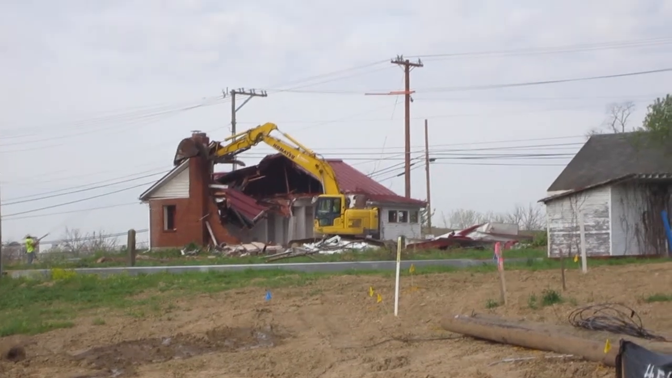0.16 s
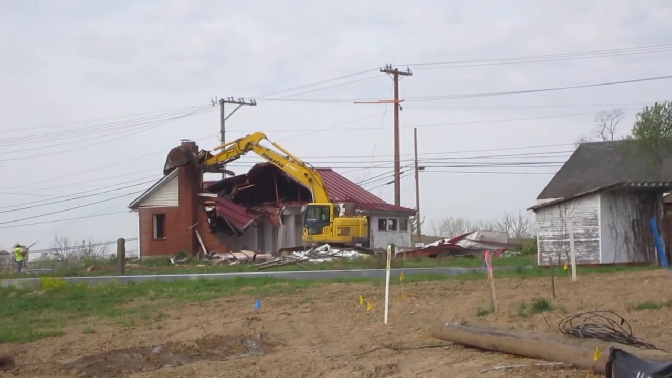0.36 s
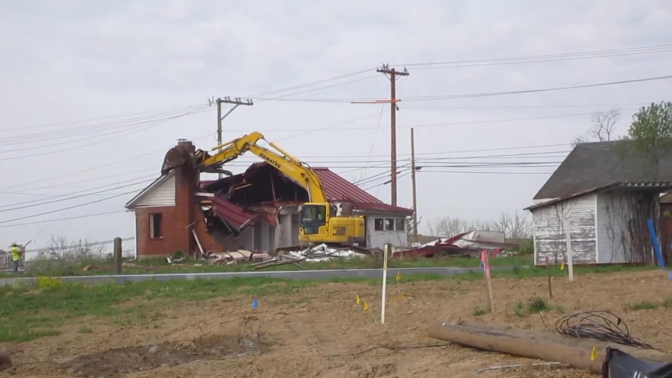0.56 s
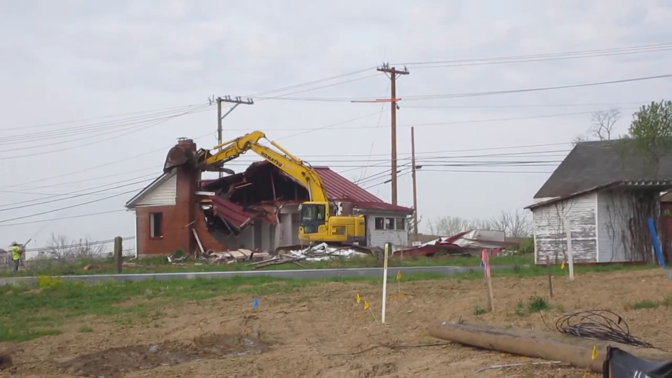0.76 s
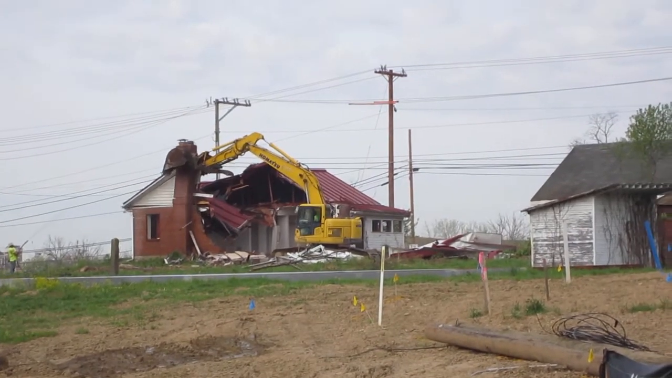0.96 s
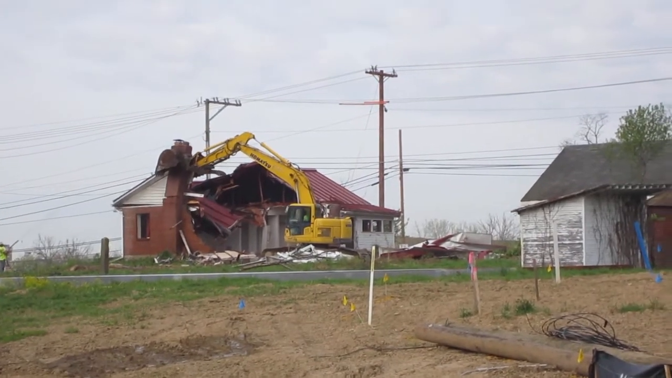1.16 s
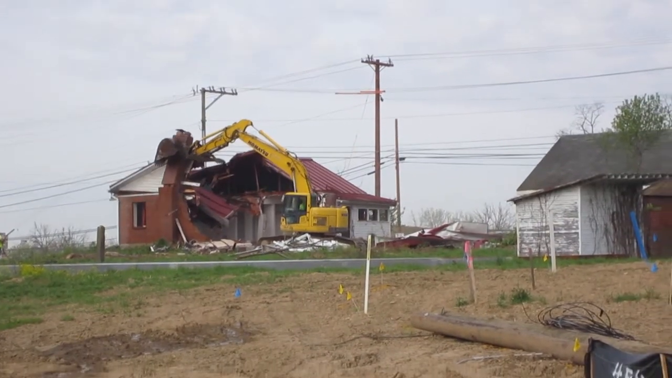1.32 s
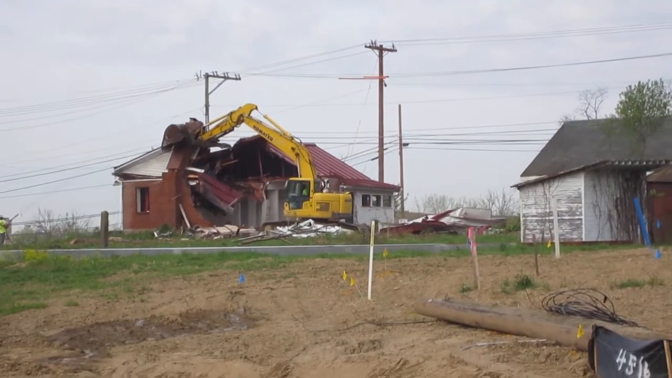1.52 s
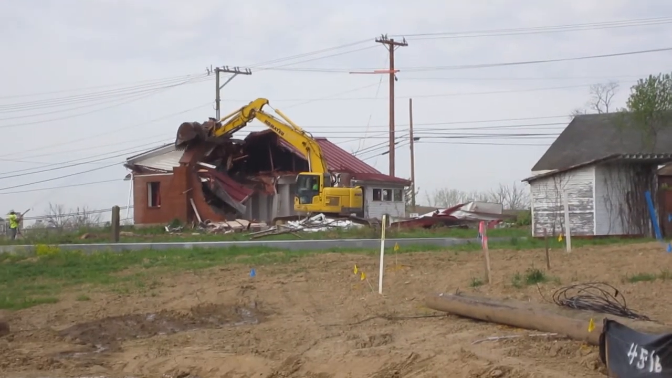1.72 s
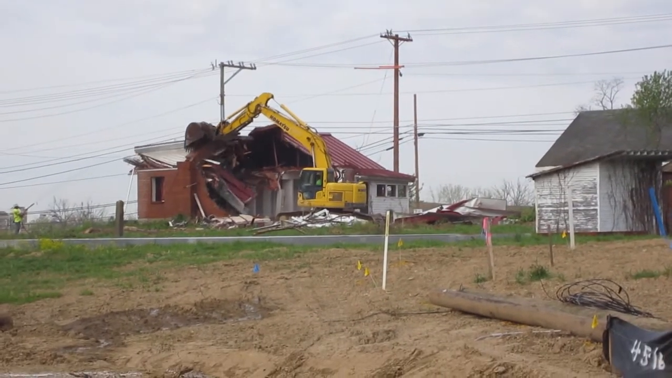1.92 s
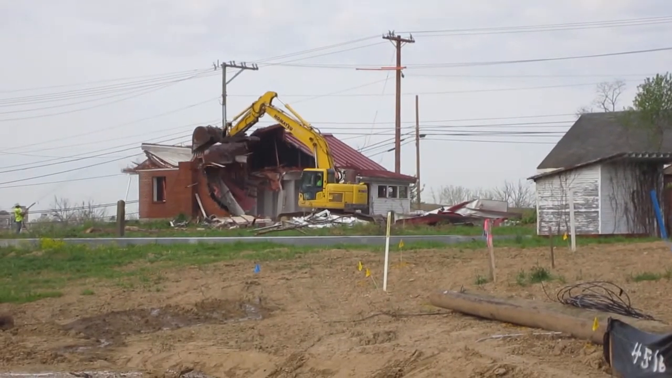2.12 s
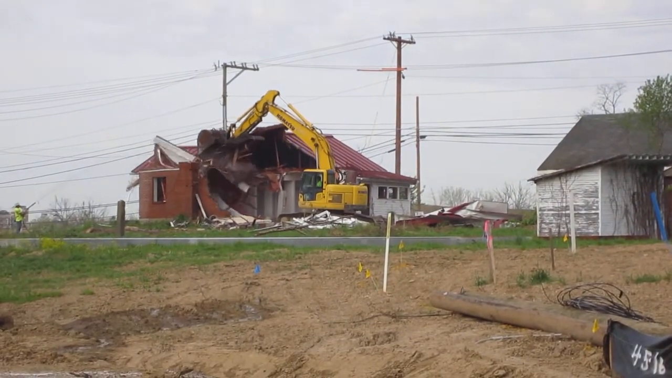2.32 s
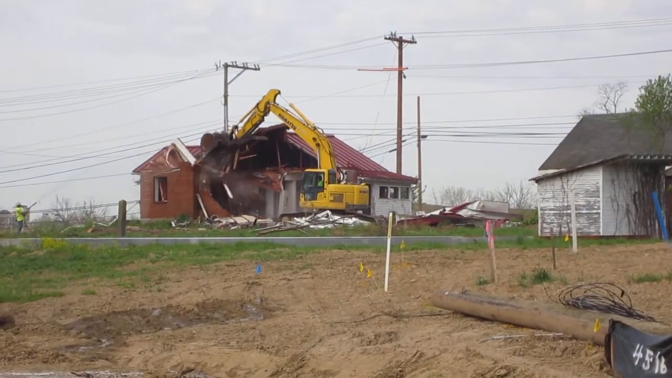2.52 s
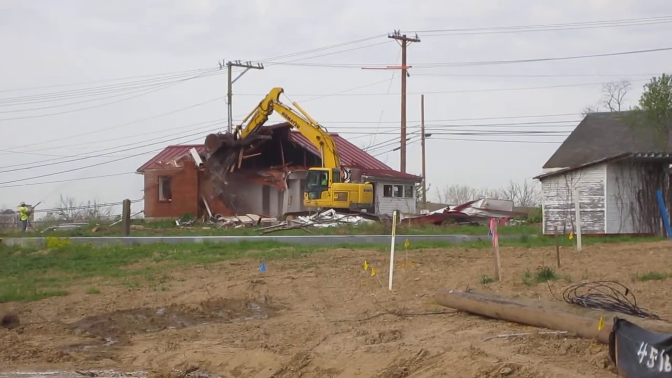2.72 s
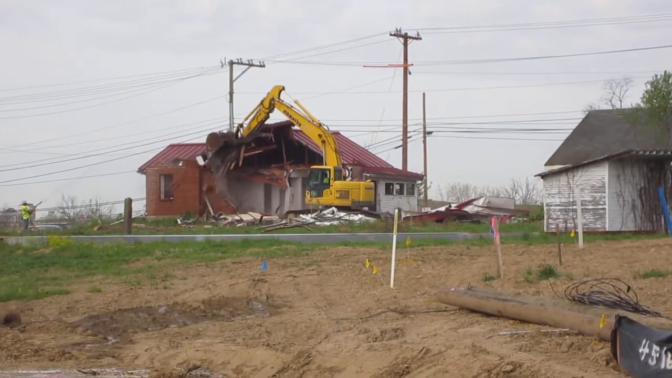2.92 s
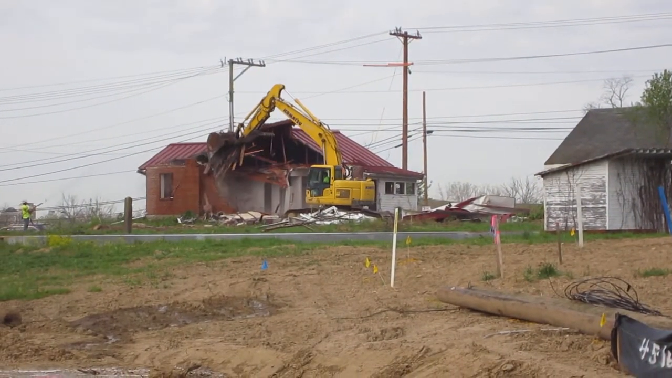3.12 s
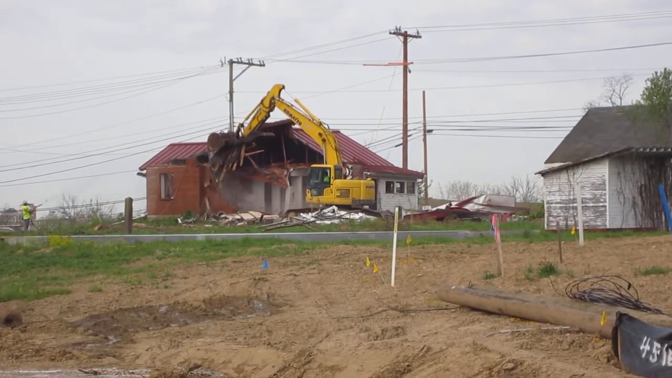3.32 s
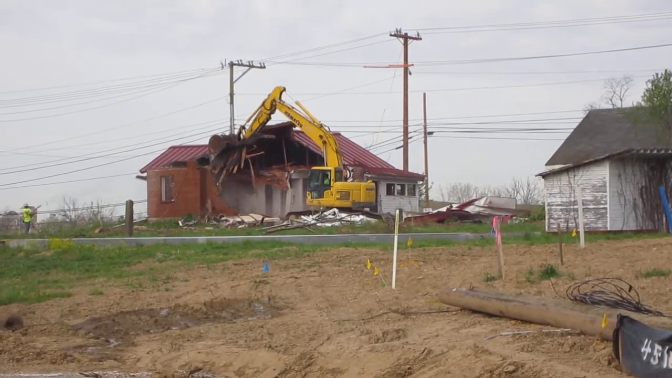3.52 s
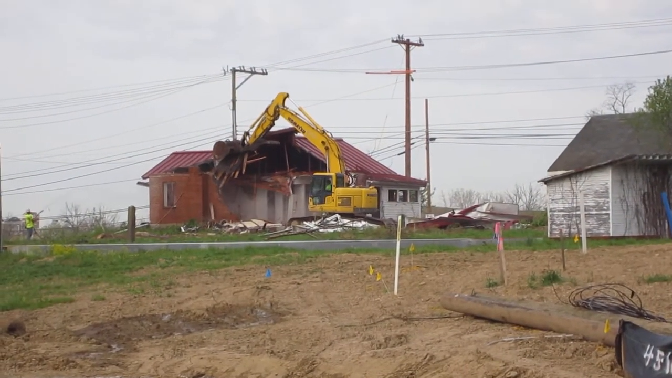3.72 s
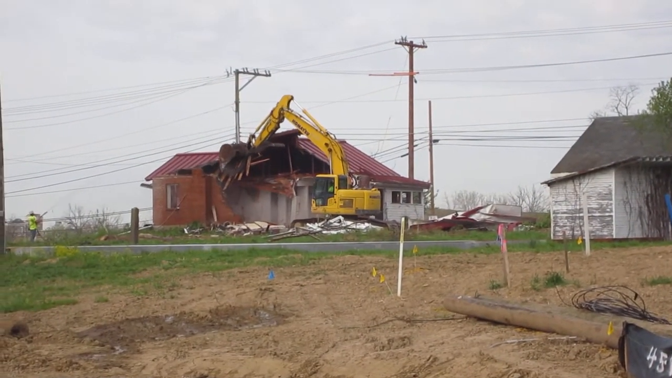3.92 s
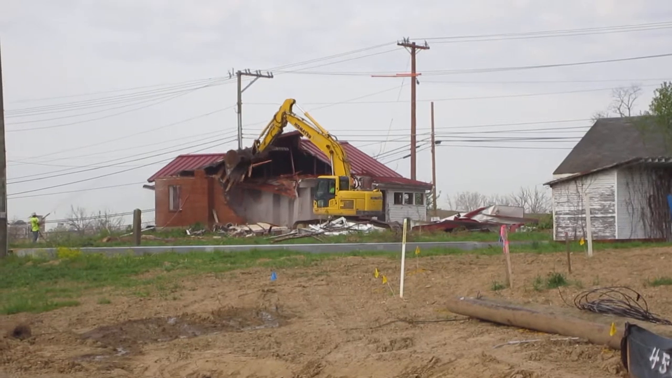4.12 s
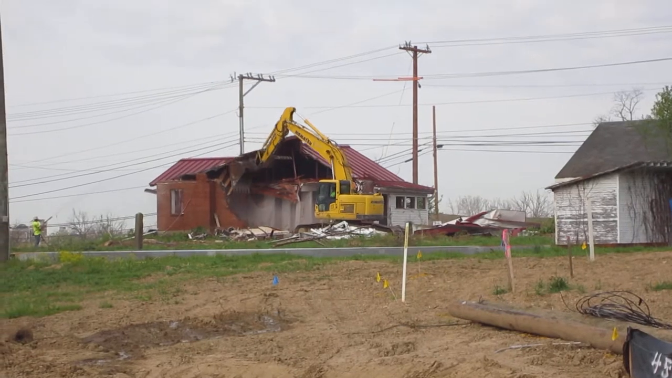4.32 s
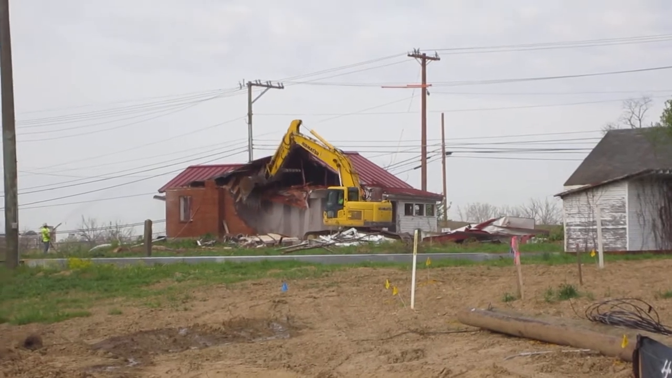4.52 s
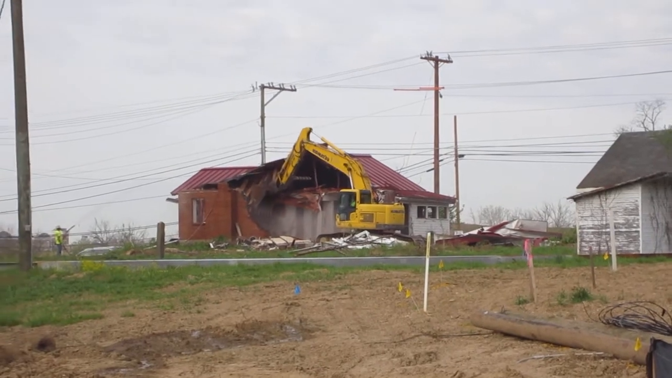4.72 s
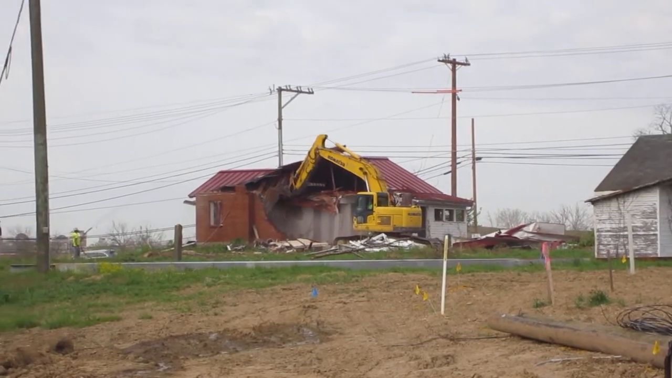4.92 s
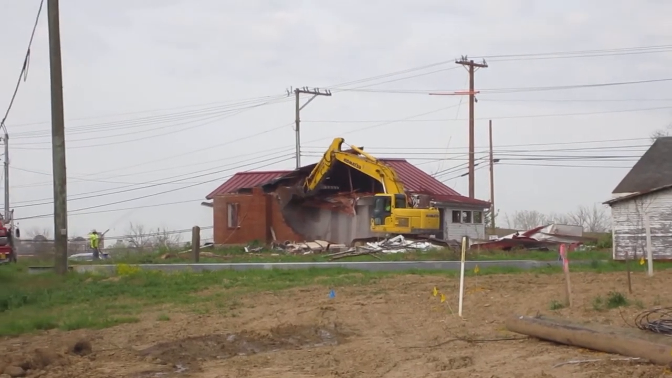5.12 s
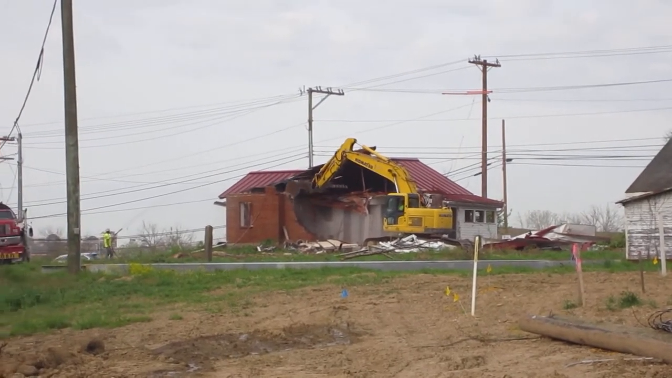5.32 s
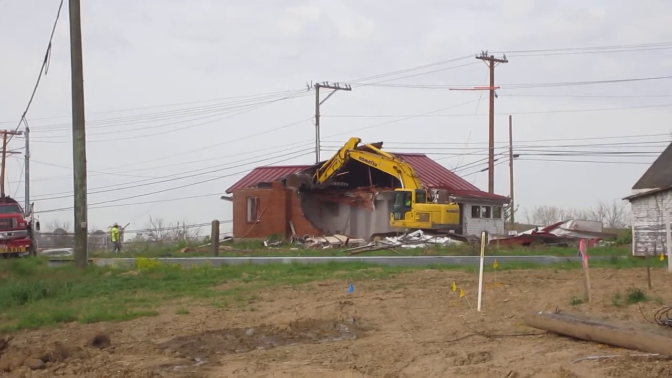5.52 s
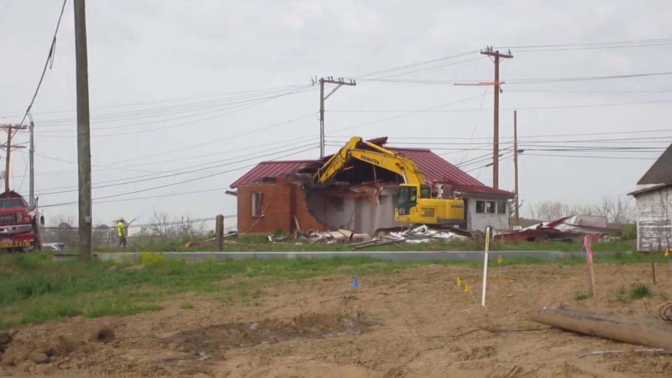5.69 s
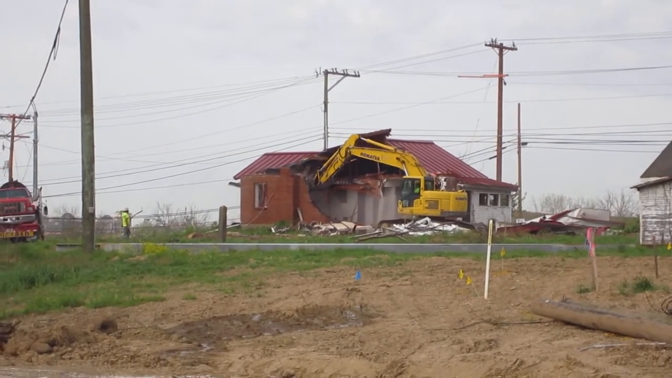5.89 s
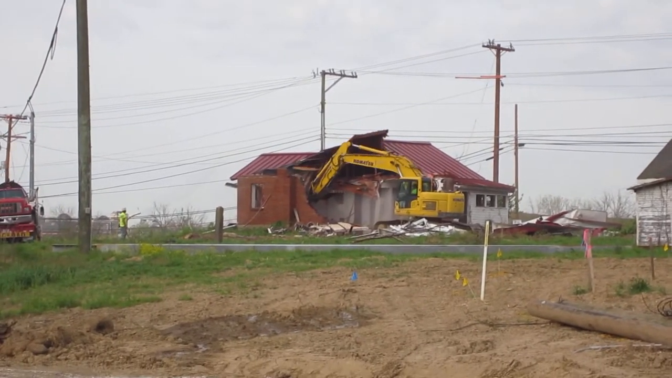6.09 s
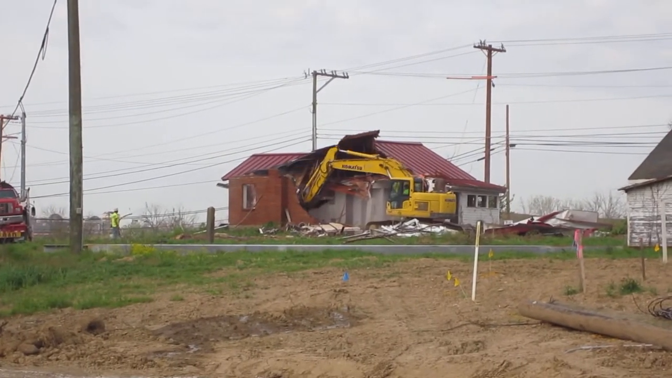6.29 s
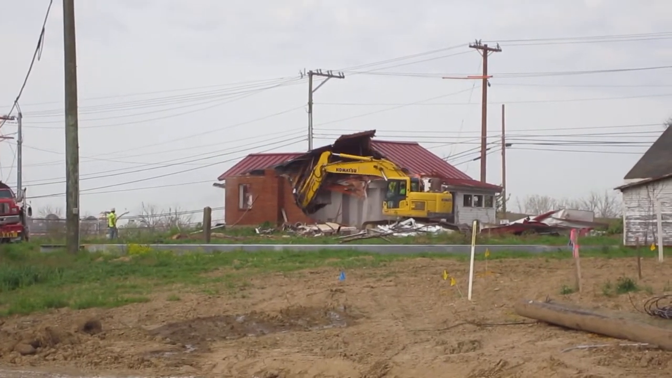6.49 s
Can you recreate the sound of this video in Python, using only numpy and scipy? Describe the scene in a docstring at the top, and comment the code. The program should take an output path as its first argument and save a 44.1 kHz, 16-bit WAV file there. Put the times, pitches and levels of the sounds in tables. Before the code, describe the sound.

Sharp timber cracks, cascading debris and deep masonry thuds over a low, uneven excavator engine, heard from a distance outdoors, with a final fresh crunch.

```python
"""A brick and timber house is pulled down by a diesel excavator across a field; nearby sheds echo it.
Rubble pours as clumps of small resonant impacts; beams crack as noise bursts with one board ringing;
scraps clink, walls shudder and masonry thuds down as swells of resonant noise.
Under it the engine fires unevenly, drones and whines.
A small camera microphone pair adds hiss, a notch and two faint whistles of its electronics."""
import sys
import numpy as np
from scipy import signal
from scipy.fft import rfft, irfft
from scipy.io import wavfile
from scipy.ndimage import uniform_filter1d

SR = 44100
rng = np.random.default_rng(int(sys.argv[2]) if len(sys.argv) > 2 else 0)


def log_audio(samples):
    """Write samples as a 16-bit WAV file to the path given in sys.argv[1]."""
    # one column per channel
    frames = np.atleast_2d(samples).T
    # limit to full scale, then quantise
    limited = np.clip(frames, -1, 1)
    pcm = np.round(limited * 32767).astype(np.int16)
    wavfile.write(sys.argv[1], SR, pcm)


N = 288855
T = np.arange(N) / SR

# colour of breaking wood and brick after the ground reflection, relative: [f/Hz, level/dB per Hz]
DEBRIS = [(150, -6.5), (400, -12), (520, -2.5), (680, 3), (950, -4), (1250, 0.5), (1480, -8), (1700, -5.5),
          (2500, -18.5), (4000, -27.5), (5500, -33), (7000, -47.5), (9500, -54.5), (12000, -63.5),
          (15000, -78.5)]
# cracks of beams and boards, before the yard's echoes:
# [t/s, level/dB, ring f/Hz, burst t60/s, brightness/dB per octave above 750 Hz]
CRACKS = [(0.2265, -32.5, 649, .12, -8), (.3034, -11, 1283, 0.0979, -1), (.305, -18, 750, .1, -9),
          (.3284, -21, 804, 0.195, -4), (.385, -25, 677, .2, -4), (.9772, -16.5, 649, 0.0293, 2.5),
          (.9914, -21.5, 813, 0.197, -2), (1.0816, -35, 655, .25, 4), (1.2155, -36, 875, .2, 3.5),
          (1.1453, -38.5, 845, .08, 3), (1.2997, -35.5, 1130, 0.0725, 6), (1.321, -34.5, 1152, 0.123, 5),
          (1.3723, -16, 1080, 0.1004, 0), (1.3894, -23, 617, 0.149, 3), (1.422, -29, 1290, 0.16, 5),
          (1.4671, -20.5, 650, 0.108, 2.5), (1.499, -16, 980, 0.077, -0.5),
          (1.5142, -17.5, 652.6, .06, 1.5), (1.5589, -18.5, 594, 0.102, 0.5), (1.6224, -28, 841, .1, 5),
          (1.632, -20, 845, .08, 2), (1.6834, -27, 616, 0.184, 1.5), (1.706, -15.5, 1250, .05, 1),
          (1.7278, -21, 1104, .07, 0), (1.803, -23.5, 1263, 0.036, 4.5), (1.8536, -28, 1309, .1, 4.5),
          (1.8851, -17.5, 1264, 0.045, 2.5), (1.9215, -14, 1325, 0.0494, 2.5),
          (1.9739, -21.5, 644.5, 0.09, 2), (2.0532, -17, 790, 0.06, 3), (2.1014, -23.5, 756, 0.066, 6.5),
          (2.153, -17, 1290, 0.0965, 1.5), (2.2724, -18, 1068, .08, -7.5), (2.3436, -10.5, 1096, 0.092, -1),
          (2.3845, -14.5, 1260, .09, -3.5), (2.4522, -12, 675, .032, 1), (2.4936, -17, 1208, .07, -6),
          (2.5429, -12.5, 719, 0.064, 3.5), (2.6045, -21, 1255, 0.0596, 6.5),
          (2.9753, -11.5, 1315, .05, -4.5), (3.0408, -7.5, 1645, 0.036, .5), (3.0891, -19, 1290, .07, 3),
          (3.1414, -11, 608, 0.0563, 3), (3.1899, -18.5, 1127, .026, 1.5), (3.4533, -23.5, 1203, .15, 6),
          (3.5538, -20, 782, 0.0615, 2.5), (3.6364, -24.5, 1276, .095, -2),
          (3.8053, -38.5, 727, 0.115, 4.5), (3.9232, -29, 1347, 0.097, 0), (4.8888, -48.5, 719, 0.071, 6),
          (5.2005, -43.5, 789, 0.057, 4.5), (5.3844, -35.5, 1151, 0.096, 1.5),
          (5.5825, -35, 516.3, 0.099, -1), (5.732, -38, 680, .16, 5), (5.7734, -30, 1150, 0.057, 2.5),
          (5.8431, -35, 1850, .2, 6), (5.958, -30, 1221, .14, -4), (5.9974, -25, 1129, 0.0985, 1),
          (6.123, -36, 678, .11, 7.5), (6.1439, -24, 578.6, 0.148, 0.5), (6.2954, -20, 508, .076, 0),
          (6.339, -21, 1170, 0.0645, 4), (6.3834, -24.5, 1069, 0.073, 4.5),
          (6.5237, -22.5, 1266, 0.047, 5.5)]


def gain_of(db):
    """Amplitude factor of a level in dB."""
    return 10 ** (np.asarray(db) / 20)


def evened(x):
    """Scales a signal to an RMS of 1."""
    return x / np.sqrt(np.mean(x ** 2) + 1e-20)


def read(points, hz):
    """Reads a (Hz, value) table along a logarithmic frequency axis."""
    f, value = np.transpose(points)
    return np.interp(np.log(hz + 1), np.log(f + 1), value)


def add(mix, s, sound):
    """Adds a sound into the mix from s seconds on."""
    part = mix[round(s * SR):][:len(sound)]
    part += sound[:len(part)]


def colour(x, points):
    """Causal, minimum-phase filter whose gain follows a (Hz, dB) table."""
    hz = abs(np.fft.fftfreq(16384, 1 / SR))
    log_gain = np.log(gain_of(read(points, hz)))
    response = np.exp(np.conj(signal.hilbert(log_gain)))
    taps = np.fft.ifft(response).real[:4096]
    return signal.oaconvolve(x, taps)[:len(x)]


def ring(x, hz, width_hz):
    """One resonance of gain 1 at its centre."""
    return signal.lfilter(*signal.iirpeak(hz, hz / width_hz, SR), x)


def brighten(x, db_per_octave, mid_db=0):
    """Tilts the octave bands from 750 Hz to 6 kHz; slope and lift at 1.5 kHz may change in time."""
    hz, spectrum = np.fft.rfftfreq(len(x), 1 / SR), rfft(x)
    octave = np.clip(np.log2(hz / 750 + 1e-9), 0, 4)
    out = 0
    for k in range(5):
        band = irfft(spectrum * np.clip(1 - abs(octave - k), 0, 1), len(x))  # overlapping triangles
        lift_db = min(k, 3) * db_per_octave + (k == 1) * mid_db
        out = out + gain_of(lift_db) * band
    return out


def knocks(rows):
    """Noise through one steep resonance, swelling quickly and falling more slowly.

    Rows: s, dB before the swell, Hz, width in Hz of one filter pass, length in s (peak at a quarter).
    """
    out = np.zeros(N)
    for s, db, hz, width_hz, length in rows:
        noise = rng.standard_normal(SR)
        resonant = ring(ring(noise, hz, width_hz), hz, width_hz)
        tone = evened(resonant[9000:])  # past the filter's build-up
        u = T[:len(tone)] / length
        add(out, s, gain_of(db) * tone * 8 * u * np.exp(-4 * u))
    return out


def thuds(blows, modes):
    """Every blow rings all the modes of the thing struck."""
    rows = []
    for s, db, length in blows:
        for hz, width_hz, mode_db in modes:
            rows.append((s, db + mode_db, hz, width_hz, length))
    return knocks(rows)


def rubble(per_s=2500, spread_db=-0.5, clump_db=-0.32):
    """Thousands of small impacts in clumps; each patch of debris rings at its own pitch and comes and goes."""
    # pouring rubble: [t/s, level/dB, brightness/dB per octave above 750 Hz]
    pour = [(0, -41.5, -5), (.42, -33, -8.5), (.95, -38, -8), (1.2, -31.5, 0), (1.36, -35, -2.5),
            (1.45, -29.5, -2.5), (1.9, -31, 1.5), (2.02, -24, .5), (2.32, -26.5, 2.5), (2.37, -22, 1),
            (2.65, -21, 4), (2.82, -23, 1.5), (3.05, -20, 3), (3.47, -23.5, 2), (3.9, -36.5, -1),
            (4.3, -36.5, -1.5), (4.8, -52.5, -4.5), (5.6, -51.5, 1.5), (5.95, -32.5, 1.5),
            (6.1, -35.5, 3.5), (6.33, -26.5, 2.5), (6.55, -24.5, 0.5)]
    body_db, body_per_db = 8.5, 0.2574  # lift at 1.5 kHz for a 0 dB pour, and its slope per dB of level
    clump = evened(uniform_filter1d(rng.standard_normal(N), 900))
    hits = rng.random(N) < per_s / SR
    size = gain_of(spread_db * np.minimum(rng.exponential(1, N), 5)) * hits
    size *= rng.choice([-1, 1], N) * gain_of(clump_db * clump)

    patch, pitches = rng.integers(0, 24, N), np.geomspace(300, 12000, num=24)
    wander = uniform_filter1d(rng.standard_normal((24, N // 64 + 1)), 25)  # one value per 64 samples
    busy = gain_of(2.99 * evened(wander)).repeat(64, 1)[:, :N]
    rings = np.zeros(N)
    for k, hz in enumerate(pitches):
        patch_ring = evened(ring(size * (patch == k), hz, 0.148 * hz))
        rings += patch_ring * busy[k] * np.sqrt(hz)
    grit = rng.standard_normal(N)
    mix = evened(rings) + 1.62 * evened(size) + 1.94 * grit

    s, db, bright = np.transpose(pour)
    level_db = np.interp(T, s, db)
    slope = np.interp(T, s, bright)
    tilted = brighten(evened(colour(mix, DEBRIS)), slope, body_db + body_per_db * level_db)
    return np.hypot(gain_of(level_db), trickle_level()) * tilted


def trickle_level():
    """Level of the bits that each crack shakes loose; their powers add up."""
    under_crack_db, rise_s, t60 = -14, .04, .6
    s, db = np.transpose(CRACKS)[:2]
    power, t = np.zeros(N), T[:SR]
    power[(s * SR).astype(int)] = gain_of(db + under_crack_db) ** 2
    shape = (1 - np.exp(-t / rise_s)) * gain_of(-60 * t / t60)
    return np.sqrt(abs(signal.oaconvolve(power, shape ** 2)[:N]))


def cracks():
    """Each crack is a wide-band burst of splintering fibres with a board and a smaller splinter ringing."""
    rise_s = 0.002934
    out, t = np.zeros(N), T[:8192]
    draws = np.sign(rng.standard_normal((len(CRACKS), len(t))))
    splinters_hz = 1800 * 3 ** rng.random(len(CRACKS))
    unit = np.std(colour(draws[0], DEBRIS))  # so that the colour keeps the level
    for (s, db, hz, t60, bright), noise, splinter_hz in zip(CRACKS, draws, splinters_hz):
        fall = gain_of(-60 * t / max(t60, .02))
        burst = noise * fall * (1 - np.exp(-t / rise_s)) ** 2
        board, splinter = ring(burst, hz, 140), ring(burst, splinter_hz, 360)
        crack = burst + 1.508 * board + 0.35 * splinter
        add(out, s, gain_of(db) * brighten(crack, bright))
    return colour(out, DEBRIS) / unit


def clinks():
    """Glass and metal scraps, plus two high splinters of the first crack at 0.302 s: short swells of narrow-
    band noise."""
    # clinks, level before swell and yard: [t/s, level/dB, f/Hz, length/s]
    scraps = [(.302, -46, 4300, .03), (.302, -49, 6000, .03), (.978, -51, 4266, 0.0625),
              (.98, -31, 1735, 0.045), (1.149, -48, 5450, 0.012), (1.42, -41, 4020, 0.0157),
              (1.476, -40.5, 4740, 0.036), (1.565, -40, 4230, .02), (1.854, -33.5, 3100, 0.0126),
              (2.062, -30, 4180, 0.0128), (3.686, -47, 3663, .016), (3.814, -53.5, 3670, 0.042),
              (4.144, -53.5, 4224, 0.048), (4.232, -48.5, 3886, 0.0328), (5.576, -40, 2088, .014),
              (5.592, -41, 2080, .014), (5.628, -43, 2200, .014), (5.749, -43, 1649, 0.064),
              (5.842, -31, 2000, 0.078), (5.841, -41, 3860, .07), (5.845, -52, 5900, .07)]
    width = 0.113  # share of the pitch, for one filter pass
    return knocks([(s, db, hz, width * hz, length) for s, db, hz, length in scraps])


def wall_panels():
    """Wall panels shudder in two low modes."""
    # blows, level before the swell: [t/s, level/dB, length/s]
    blows = [(.98, -35, 0.24), (1.38, -36, 0.55), (2, -28.5, 0.416), (2.35, -32, 0.62), (2.9, -35, 0.54),
             (6.12, -36.5, .3)]
    # modes of the panels: [f/Hz, width of one filter pass/Hz, level against the blow/dB]
    modes = [(175.47, 29.2, 0), (244.4, 31.3, -3.5)]
    return thuds(blows, modes)


def masonry():
    """Masonry lands and the ground answers in three deep modes."""
    # blows, level before the swell: [t/s, level/dB, length/s]
    blows = [(3.08, -27, .3), (3.4, -36, 0.01), (6.2, -36.5, 0.52)]
    # modes of the ground: [f/Hz, width of one filter pass/Hz, level against the blow/dB]
    modes = [(61.3, 31, -3), (105, 65, 0), (144.4, 45, -9)]
    return thuds(blows, modes)


def engine():
    """Firing tone, hydraulic pump whine, uneven exhaust pulses, and a drone that throbs with each firing."""
    # engine under changing load: [t/s, firing rate f/Hz, firing tone level/dB RMS]
    load = [(0, 90.91, -40), (.31, 91.4, -37), (.6, 97, -44.5), (1.11, 89.41, -40.5), (1.53, 92.67, -38.5),
            (2.03, 99.43, -42), (2.48, 96, -36), (2.94, 95.46, -37), (3.15, 88, -50.5),
            (3.74, 90.72, -39.5), (5, 90.32, -40), (5.6, 88.75, -36.5), (6.04, 92.97, -44),
            (6.35, 91.82, -37), (6.55, 97.9, -41.5)]
    # strength of each firing in the cycle: [level/dB]
    cylinders = [1.5, 5, -3.5, 2, -3, -3]
    # relative colour of the exhaust pulses: [f/Hz, level/dB]
    exhaust = [(30, -16.5), (60, -9), (130, -9.5), (200, -7.5), (300, -14.5), (600, -2.5), (1200, -30),
               (2000, -55.5)]
    # relative colour of the drone: [f/Hz, level/dB]
    drone_colour = [(13, -39.5), (22, -20), (55, -10.5), (100, -12), (150, -15), (281, -15.5), (420, -21),
                    (488, -24.5), (540, -15), (620, -17.5), (1280, -24.5), (1480, -34), (2200, -42.5),
                    (3000, -60), (4900, -53), (6870, -67), (8930, -102)]
    drone_db, pulses_db, pump_db = -35.5, -47.5, -49  # RMS
    pump_hz = 532
    s, hz, db = np.transpose(load)
    firings = np.cumsum(np.interp(T, s, hz)) / SR  # running count
    tone = gain_of(np.interp(T, s, db)) * np.sqrt(2) * np.sin(2 * np.pi * firings)

    strength = gain_of(np.take(cylinders, firings.astype(int), mode="wrap"))
    pulses = colour(np.diff(np.floor(firings), prepend=0) * strength, exhaust)

    throb = 1 + 0.1 * strength * np.exp(-(firings % 1) / .3)
    swell = evened(uniform_filter1d(uniform_filter1d(rng.standard_normal(N), 5000), 5000))
    drone = colour(rng.standard_normal(N) * throb * gain_of(0.62 * swell), drone_colour)

    pump = np.sin(2 * np.pi * np.cumsum(pump_hz + 3. * swell) / SR)  # pitch drifts with the swell
    steady = gain_of(pump_db) * evened(pump) + gain_of(drone_db) * evened(drone)
    return tone + steady + gain_of(pulses_db) * evened(pulses)


def yard(x, t60=0.765, wet_db=-13, near_hz=900, apart=1.79):
    """A shed wall's echo and a sparse, dying tail, partly shared and partly different left and right."""
    echo_s, echo_db = 0.035, 0.5  # level over the first scattered taps
    t = T[:SR // 2]
    sparse = rng.random((3, len(t))) < .045
    tails = rng.choice([-1., 1.], (3, len(t))) * sparse * gain_of(-60 * t / t60)
    both, left, right = tails
    both[round(echo_s * SR)] += gain_of(echo_db)
    own = signal.lfilter(*signal.butter(1, near_hz, "high", fs=SR), [left, right])  # close ports share long waves
    taps = both + apart * own
    taps *= gain_of(wet_db) / np.linalg.norm(taps, axis=1)[:, None]
    taps[:, 0] += 1  # direct sound
    return signal.oaconvolve(x[None], taps, axes=1)[:, :N]


def scene():
    """Mid and treble of house and engine reach the two ports a little differently; the bass is alike in both."""
    house = yard(rubble() + cracks() + clinks())
    bass = wall_panels() + masonry()
    motor = engine()
    low = signal.sosfiltfilt(signal.butter(2, 220, fs=SR, output="sos"), motor)  # long waves scatter little
    motor_rest = yard(motor - low, t60=0.46, wet_db=-6) * gain_of(-2.0)
    return house + bass + low + motor_rest


def record(dry):
    """The microphone pair: hiss, port balance, notch near half the picture line rate, whistles, band limit."""
    # far-off wash and preamp hiss, gain on unit white noise ahead of the notch: [f/Hz, level/dB]
    hiss_colour = [(40, -42), (150, -46), (300, -60), (700, -59.5), (1800, -41.5), (2600, -54),
                   (5000, -63.5), (7000, -82.5), (8500, -80.5), (15500, -76.5)]
    # balance of the ports: [f/Hz, left minus right level/dB]
    balance = [(60, 0.5), (100, -2), (170, 1), (280, -1.5), (480, -2), (800, -1), (1350, -2.5), (2270, -3),
               (3820, -1), (6420, 1)]
    # phase between the ports: [f/Hz, left leads/rad]
    lead = [(300, 0), (950, -0.26), (3880, 0.12), (4820, -.2), (6630, -.1)]
    # whistles of the electronics, ahead of the band limit: [f/Hz, left level/dB RMS, right level/dB RMS]
    whistles = [(7867.1, -86, -86), (15734.3, -86, -76)]
    edge_hz = 15830
    hz = np.fft.rfftfreq(N, 1 / SR)
    hiss = rfft(rng.standard_normal((2, N))) * gain_of(read(hiss_colour, hz))  # unlike at each port
    port = gain_of(read(balance, hz) / 2) * np.exp(.5j * read(lead, hz))  # half to each side
    response = 1 - 0.816 * np.exp(-((hz - 7900) / 700) ** 2)  # the notch
    response *= hz ** 2 / (hz ** 2 + 30 ** 2)  # the capsules lose the deepest bass
    out = irfft((rfft(dry) * [port, 1 / port] + hiss) * response, N)
    for f, left_db, right_db in whistles:
        out = out + gain_of([[left_db], [right_db]]) * np.sqrt(2) * np.sin(2 * np.pi * f * T)
    band_limit = signal.firwin(1023, edge_hz, window=("kaiser", 9), fs=SR)
    return signal.oaconvolve(out, band_limit[None], "same")


dry = scene()
out = record(dry)
log_audio(out)
```